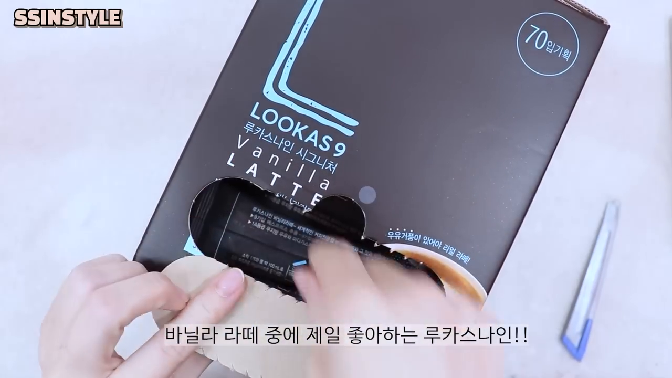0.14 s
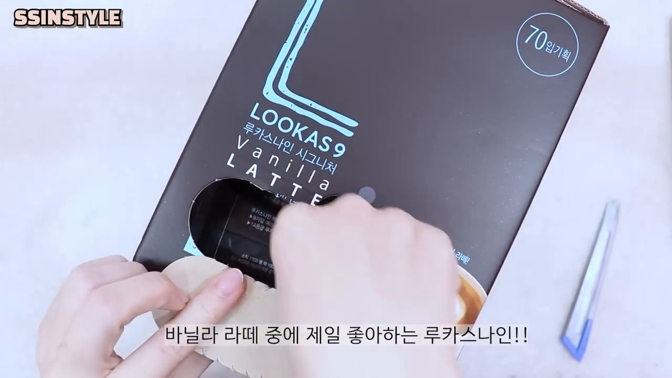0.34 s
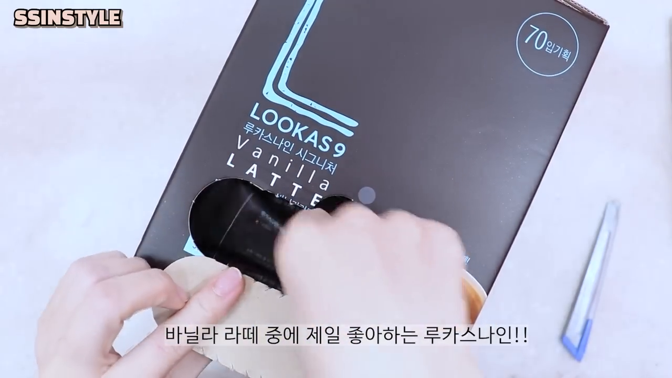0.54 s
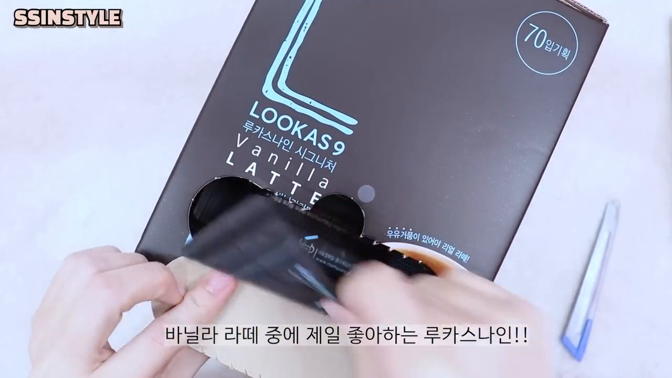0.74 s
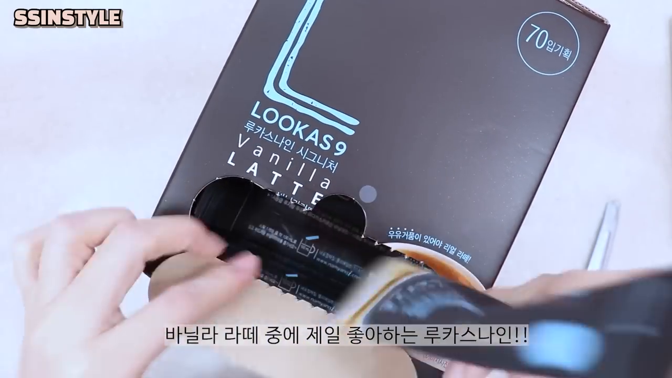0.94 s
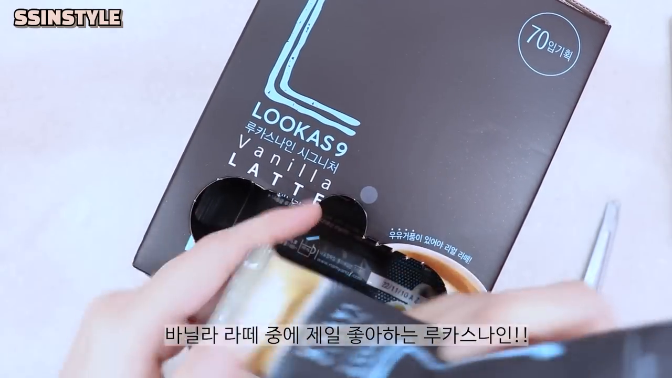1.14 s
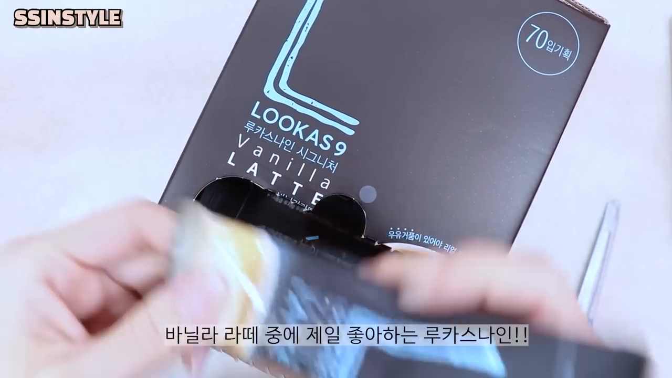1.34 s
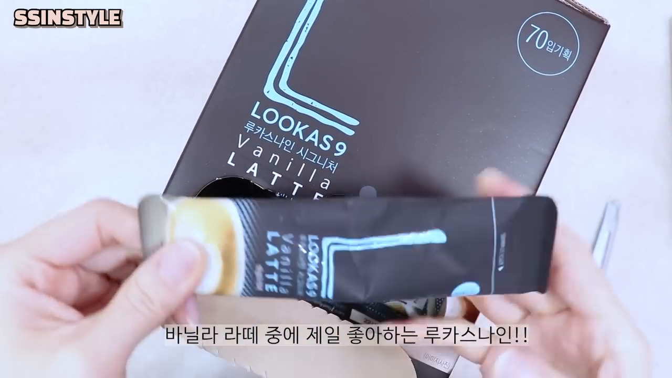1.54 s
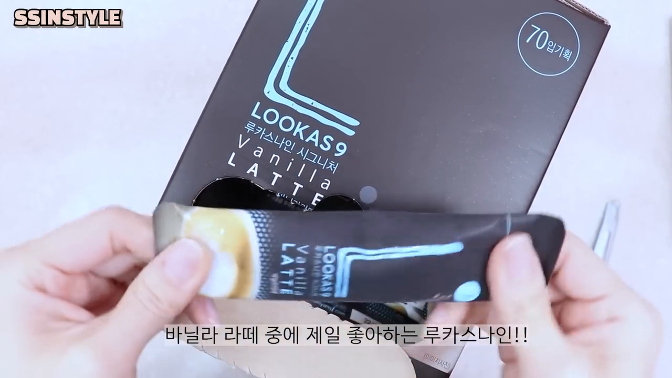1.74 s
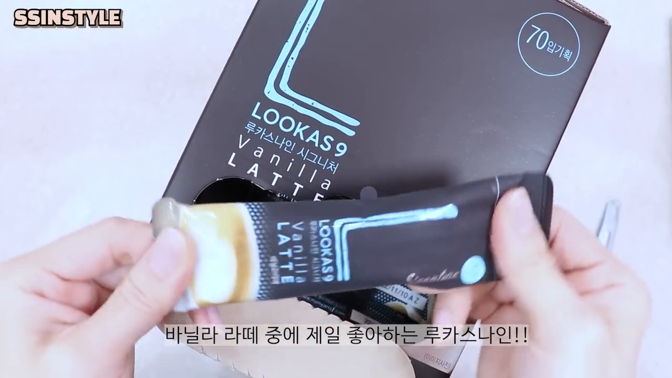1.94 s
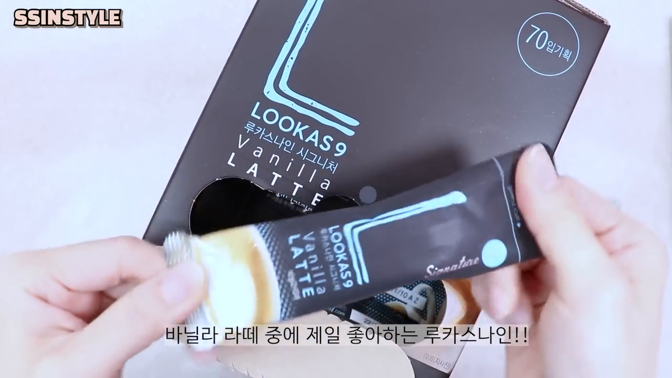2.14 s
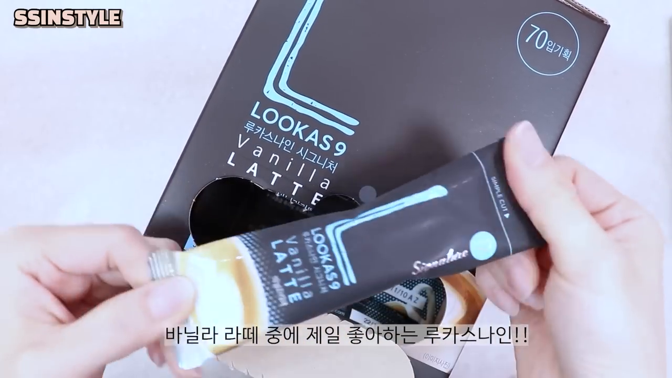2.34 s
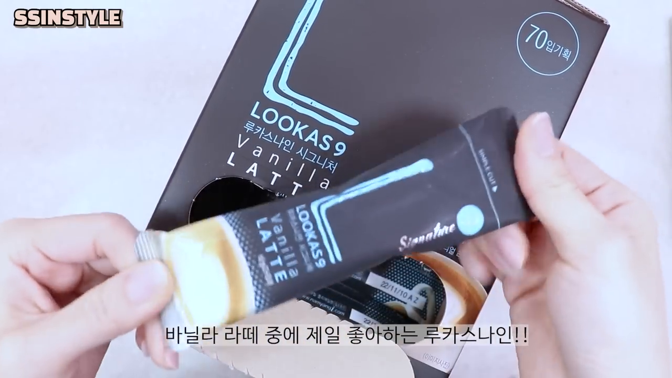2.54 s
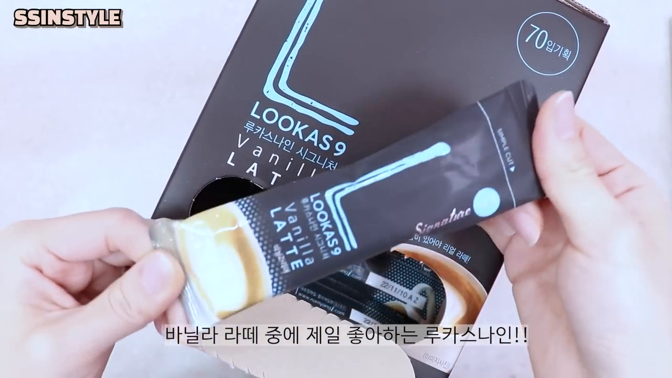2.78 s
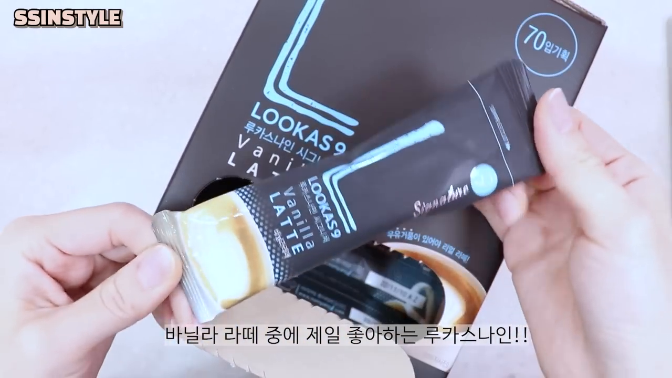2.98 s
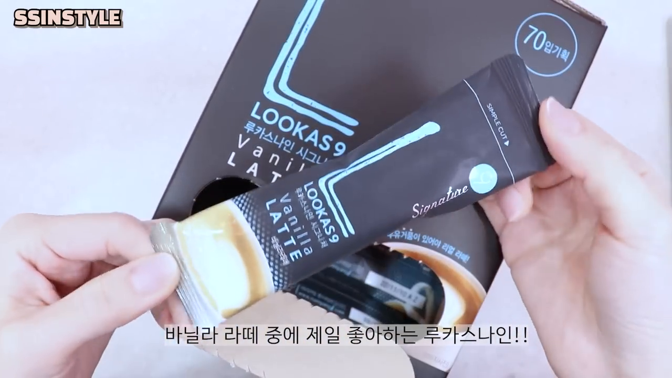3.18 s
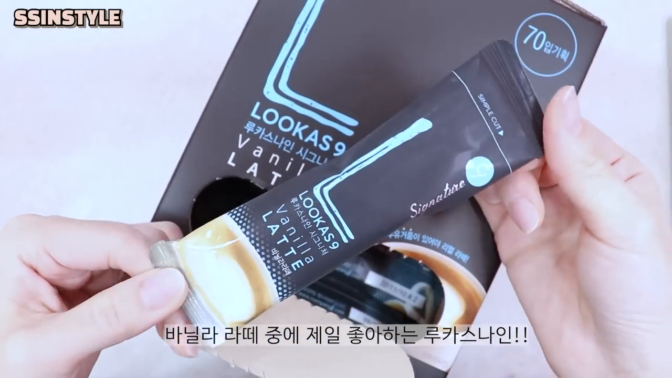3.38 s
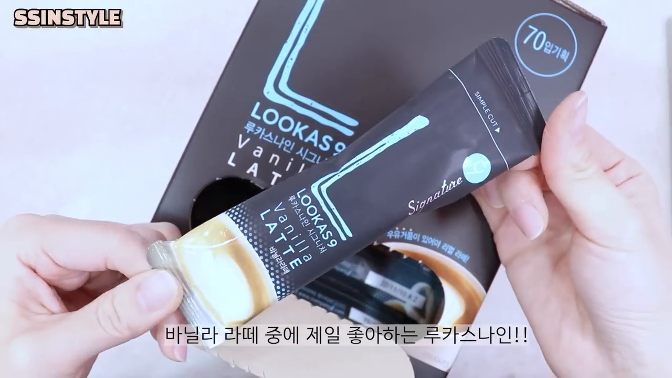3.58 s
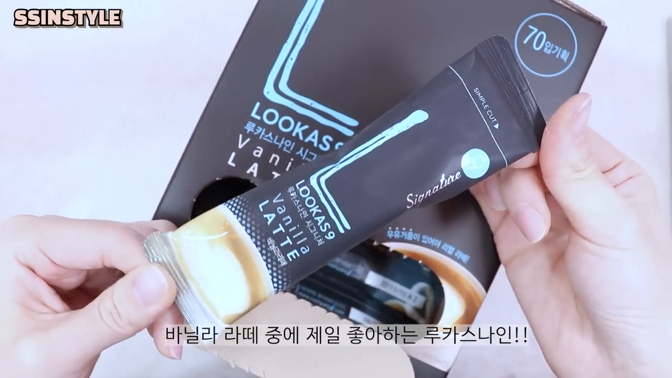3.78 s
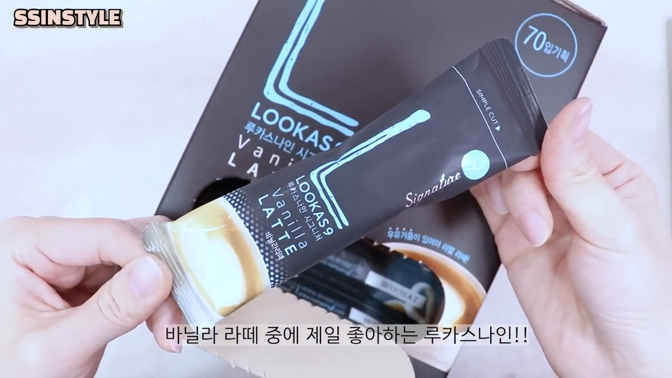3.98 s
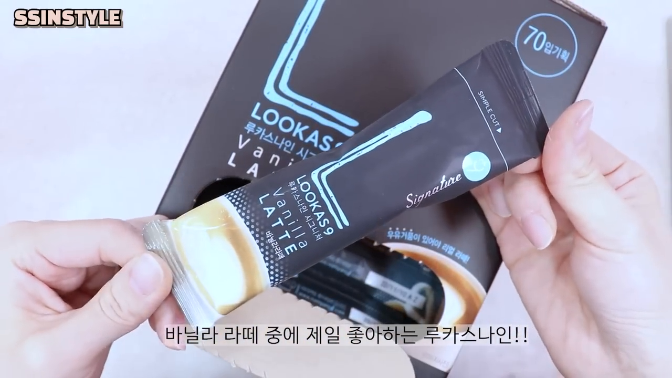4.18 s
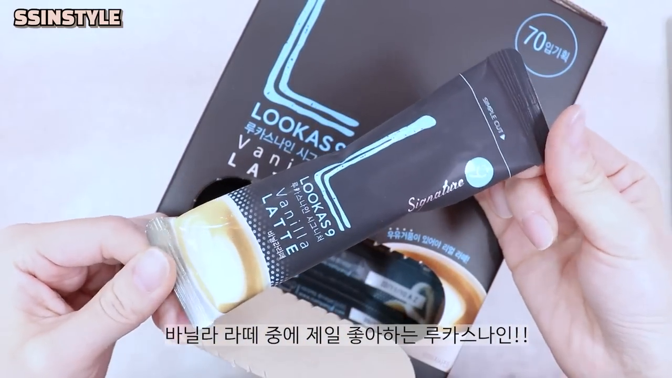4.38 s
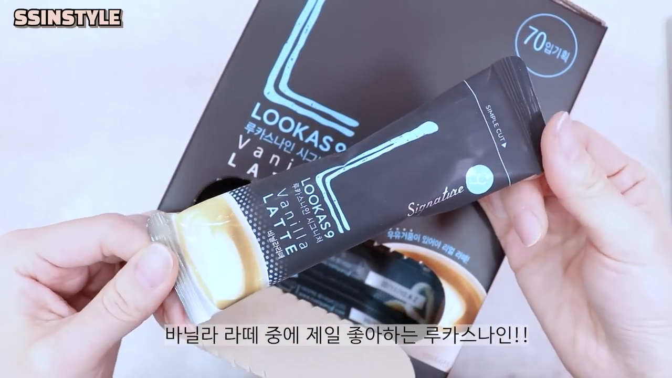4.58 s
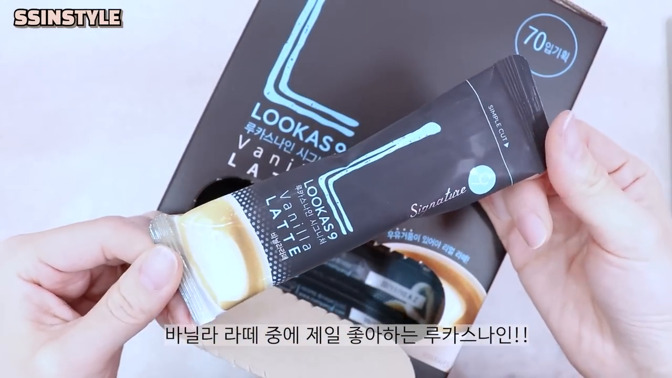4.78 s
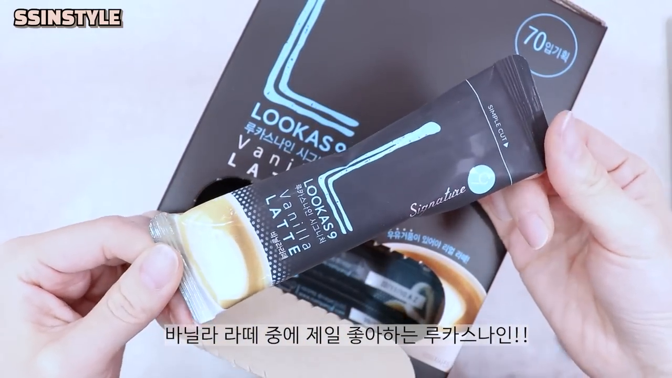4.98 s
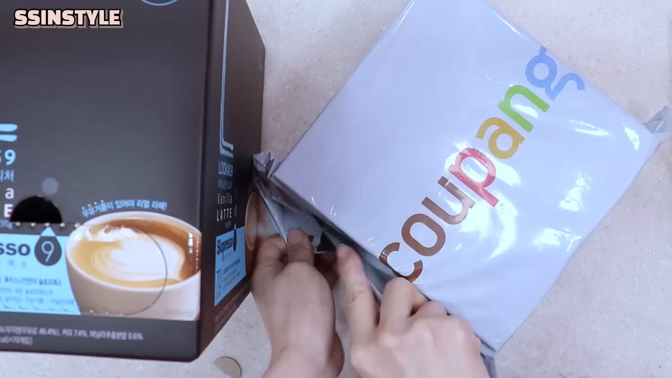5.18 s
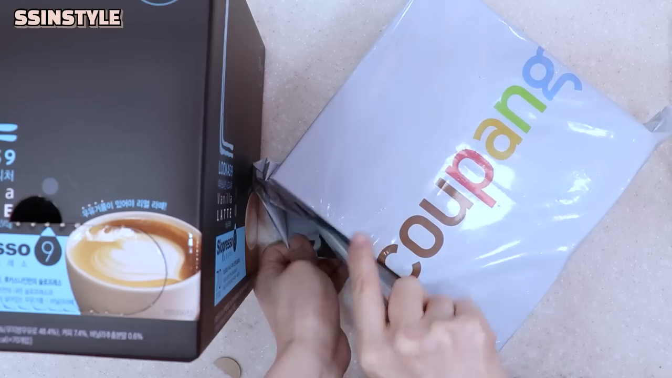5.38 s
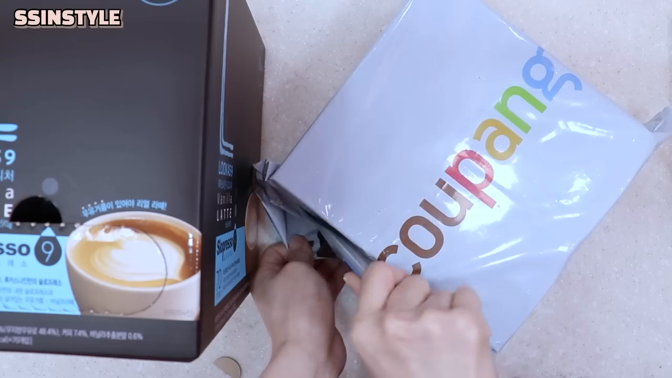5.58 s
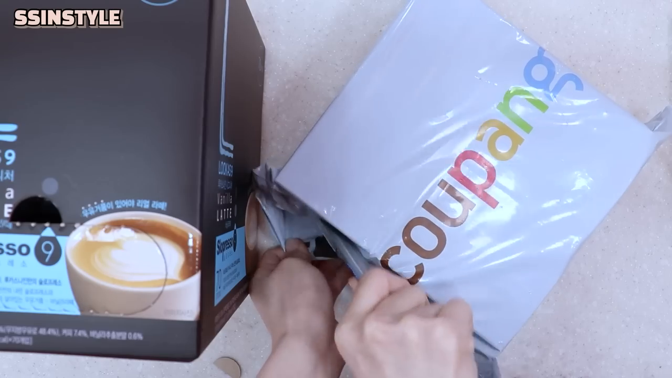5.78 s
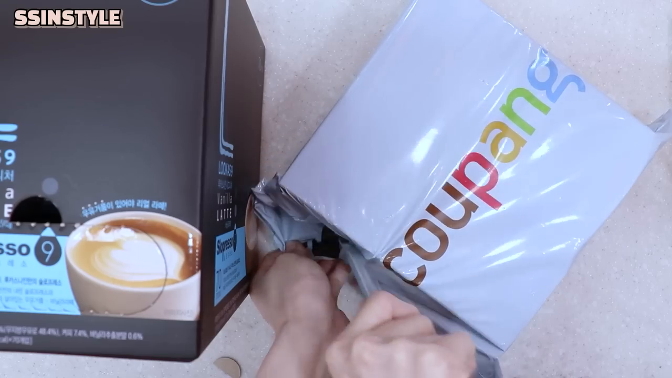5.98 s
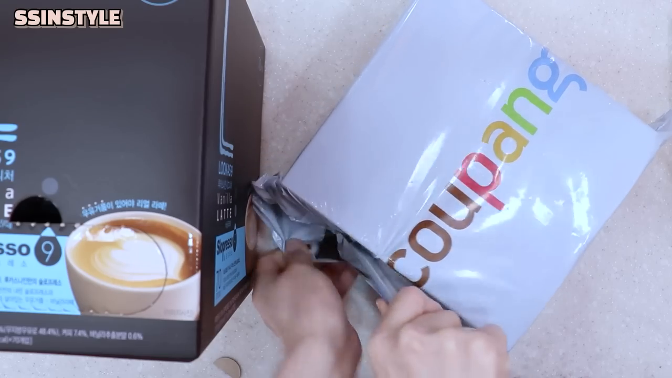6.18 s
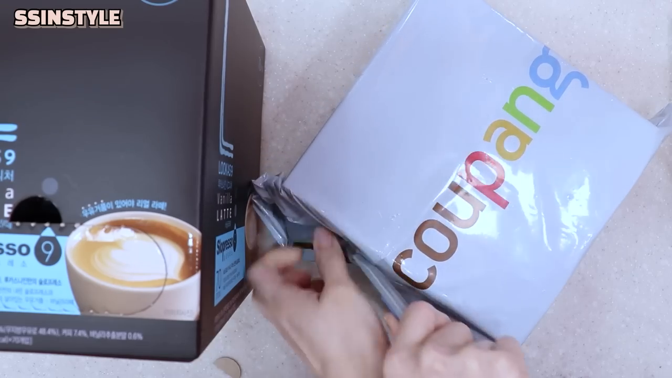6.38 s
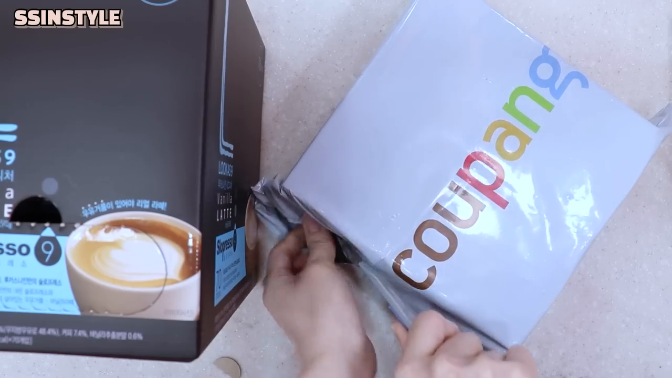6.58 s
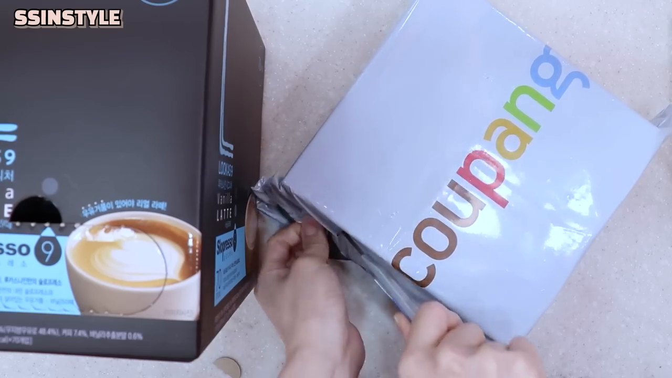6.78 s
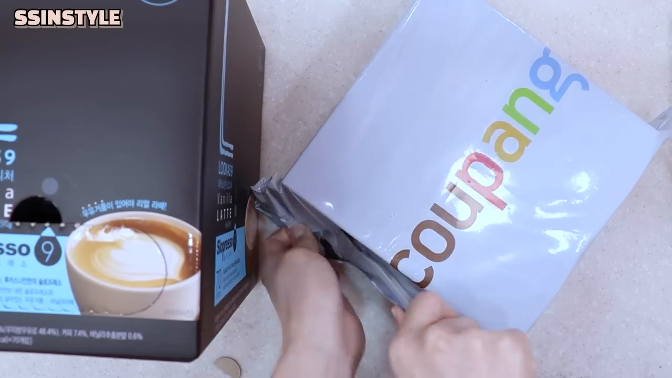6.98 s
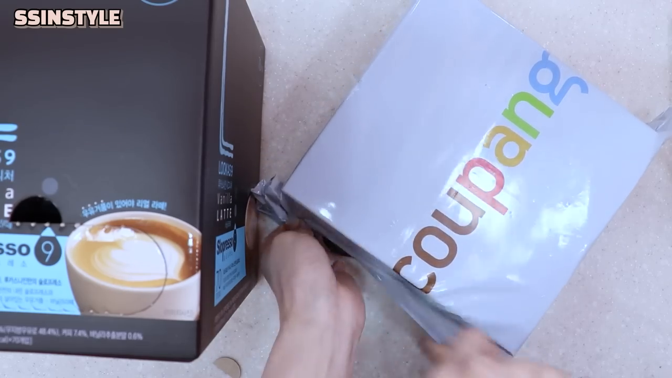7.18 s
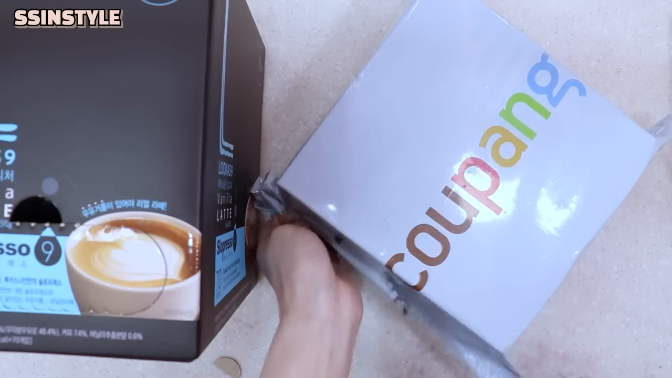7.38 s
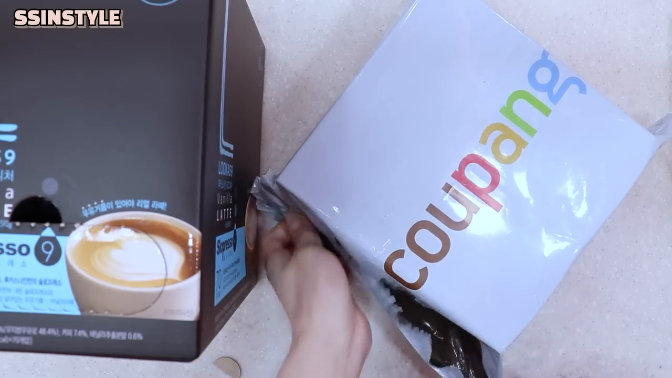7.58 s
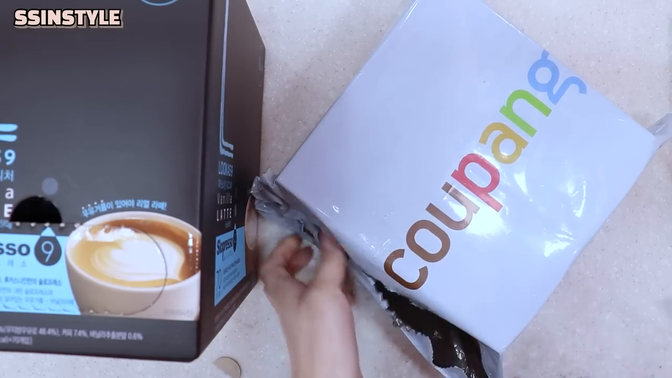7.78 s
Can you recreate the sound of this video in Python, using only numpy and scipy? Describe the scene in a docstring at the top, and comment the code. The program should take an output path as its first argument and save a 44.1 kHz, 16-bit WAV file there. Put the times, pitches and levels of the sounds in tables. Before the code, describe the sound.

Close foil rustling with sharp creases and hollow card knocks settles to near quiet, then thin plastic crumples in jerky tugs, peaking in loud snaps.

```python
"""Film hisses and crackles, creases snap, a box knocks: hands pull a foil sachet of drink powder out of a
cardboard box and turn it over, then tug open a plastic mailer bag whose slack wall flaps.
Snaps are noise bursts through ringing facets; sliding film is friction hiss mixed with a swarm of tiny wrinkles;
box and bag are struck modes. A close stereo microphone hears it in a small room with a low hum; peaks clip."""
import sys
import numpy as np
from scipy import signal
from scipy.fft import rfft, irfft, next_fast_len
from scipy.io import wavfile
from scipy.ndimage import map_coordinates

SR = 44100
rng = np.random.default_rng(int(sys.argv[2]) if len(sys.argv) > 2 else 0)


def log_audio(samples):
    """Write samples as a 16-bit WAV file to the path given in sys.argv[1]."""
    # one column per channel
    frames = np.atleast_2d(samples).T
    # limit to full scale, then quantise
    limited = np.clip(frames, -1, 1)
    pcm = np.round(limited * 32767).astype(np.int16)
    wavfile.write(sys.argv[1], SR, pcm)


N = 345741

# bass, middle and treble of the film: (low edge [Hz], high edge [Hz])
BAND_EDGES = [(130, 1450), (1450, 5300), (5300, 17000)]
BANDS = [signal.butter(3, edges, "band", fs=SR, output="sos") for edges in BAND_EDGES]

# the loudest creases snapping through:
# (time [s], middle level [dB], facet pitch [Hz], bass re middle [dB], treble re middle [dB], force t60 [s])
CREASE_SNAPS = [(0.403, -33.5, 3000, -13, -6, 0.0044), (0.4434, -32.5, 2650, -6, -12, 0.0043),
                (0.5091, -27, 1980, -5, -22, .011), (0.57, -27, 1850, -7, -9, 0.0066),
                (0.581, -25, 2000, -12, -9, 0.017), (0.6454, -22.5, 2610, -4, -4.5, 0.023),
                (0.6542, -27, 1200, -2, 0, 0.013), (0.6943, -20, 2760, -8, -4.5, 0.011),
                (0.724, -17.5, 2160, -10, -1.5, 0.0099), (0.7446, -15.5, 5450, -15, 4, 0.0065),
                (0.7667, -10.5, 2500, -20, -7, 0.011), (0.7982, -10, 2490, -15, -7.5, 0.025),
                (0.9016, -19.5, 3060, -10, -14, 0.0023), (0.931, -15.5, 2790, -22, -9, 0.029),
                (1.3035, -30, 1530, -3, -7, 0.013), (1.7704, -20, 4370, -10.5, -10, 0.0034),
                (1.7797, -25, 4280, -15, 5, 0.0054), (1.79, -24.5, 1880, -8, -23, 0.0044),
                (1.8155, -14, 2100, -16, -13, 0.013), (1.8238, -11.5, 3080, -10, -3, 0.0077),
                (1.907, -24.5, 4200, -20, -8, 0.016), (1.932, -22.5, 4900, -13, -0.5, 0.011),
                (1.9621, -25, 3230, -17, -3, 0.0059), (1.9789, -21.5, 3010, -11.5, -3, 0.018),
                (2.1849, -19, 2430, -21, -14, 0.024), (2.1906, -24.5, 4420, -14, 4.5, 0.014),
                (2.2297, -18.5, 1680, -16, -13, 0.0089), (2.2585, -18, 2430, -4.5, -5, 0.01),
                (2.2959, -23.5, 2500, -12, -16, 0.033), (2.388, -19.5, 2470, -12, -5.5, 0.0064),
                (2.408, -22, 2520, -7.5, -8, 0.017), (2.532, -19, 3600, -6.5, -5.5, 0.0084),
                (2.6047, -29, 4740, -29, 0.5, 0.0026), (2.6402, -26.5, 2090, -8.5, -13, 0.01),
                (2.914, -39.5, 2620, -9, -6, 0.0028), (3.17, -25.5, 2730, -10, -3.5, 0.0022),
                (3.197, -27.5, 3520, -13, -5, 0.029), (3.6183, -29.5, 3700, -9, -17, 0.0097),
                (4.0266, -34.5, 3400, -41, -10.5, 0.0038), (4.4954, -32, 3600, -15, -21, 0.0051),
                (4.54, -38.5, 2780, -10, -9.5, 0.11), (4.586, -42, 2370, -23, -10, .03),
                (5.27, -28, 2400, -12, 4, 0.0025), (5.281, -21.5, 2740, -10, 2.5, 0.0022),
                (5.2932, -27, 2220, -15, -1, .014), (5.313, -30.5, 1200, -2, -14, 0.0055),
                (5.399, -26.5, 6100, -14, -4, 0.023), (5.458, -17, 2720, -24, 2.5, 0.042),
                (5.546, -18, 4780, -39, 2, 0.045), (5.599, -24.5, 5100, -13, -1.5, 0.027),
                (5.619, -24, 5240, -43, -7, 0.016), (5.648, -31, 3000, -12, -10, 0.012),
                (5.676, -16.5, 3100, -47, 4.5, 0.023), (5.744, -31.5, 2220, 0, 4, 0.0054),
                (5.831, -24, 1690, -15, -50, 0.011), (5.9341, -33.5, 3700, -14, 7, 0.0071),
                (5.947, -31.5, 5930, -2, -2, 0.0074), (5.974, -31, 6490, -10, -2, .005),
                (5.993, -25, 6400, -5, 1, 0.014), (6.011, -23.5, 2920, -8.5, -14, 0.0057),
                (6.025, -20, 2550, -12.5, -1.5, 0.0053), (6.0473, -18.5, 3350, -17, -4, 0.0035),
                (6.0745, -31, 4500, -13, 2.5, 0.0031), (6.1052, -24, 2470, -8, -5.5, 0.015),
                (6.3183, -24.5, 2900, -8, -11, 0.013), (6.4052, -37, 2450, -3, 2, 0.034),
                (6.591, -31, 4430, -8.5, -2.5, 0.0061), (6.634, -29.5, 1730, -7, -4, 0.0099),
                (6.693, -23.5, 4700, -23, -8, 0.0083), (6.7426, -28, 4050, -17, -3, .007),
                (6.9833, -29, 3060, -29, 1, 0.0038), (6.9605, -31, 5460, -25, -2, 0.011),
                (7.014, -24.5, 5500, -34, -5, 0.046), (7.0894, -21, 2980, -15, -8, 0.0032),
                (7.1128, -40.5, 2400, 18, 7, 0.0031), (7.1354, -16, 3050, -10.5, -13, 0.084),
                (7.1576, -26, 2540, -21, -6, 0.0046), (7.183, -12, 2930, -5.5, 1, 0.013),
                (7.24, -5, 3160, -17, -3, 0.015), (7.2777, -14, 5240, -7, 2.5, 0.0098),
                (7.2831, -14, 8200, -9, -1.5, 0.0095), (7.293, -23, 8400, -7, 5, 0.0092),
                (7.318, -26, 4000, -8, -8, .004), (7.3324, -27.5, 2870, -8, 3, 0.012),
                (7.3738, -19.5, 1850, -7.5, -9, 0.0082), (7.385, -16, 3460, -2.5, -5, 0.0073),
                (7.3946, -22, 7460, -5.5, -4.5, 0.011), (7.4003, -24, 7660, -7, 7, 0.0062),
                (7.5802, -26, 6300, -6, 0, 0.0063), (7.601, -17, 3280, -49, -2, 0.035),
                (7.636, -25.5, 7440, -28, 4.5, .034), (7.712, -19, 3360, -48, -23, 0.019),
                (7.7298, -22.5, 3900, -43, 6, 0.018), (7.778, -32, 3100, -18, -2, .004),
                (7.8137, -20.5, 4600, -29, 9.5, 0.02)]


def snaps(facet_cycles=12, facet_db=-5, attack_s=0.00037, lead_in_db=-17, lead_in_share=0.063,
          tail_db=-26, tail_t60=0.04, sheet_db=-15, sheet_hold=1.34, cut_hz=520, dull_hz=6000,
          octave_db=17, dull_octave_db=7, pan_db=2.0, side_db=-3, left_lead_s=0.00003, lead_spread_s=0.00003):
    """A crease buckles in a quick noise burst with a faint, short lead-in; the facet rings and the sheet shivers on."""
    out, size, lead_s = np.zeros((2, N)), 2048, .005
    t = np.arange(size) / SR - lead_s
    after = np.maximum(t, 0)
    noise = stereo_noise(np.add(FILM_WIDTH, [0, side_db]), size=size * len(CREASE_SNAPS))
    chance = rng.standard_normal((len(CREASE_SNAPS), 5))
    for k, (crease, (pan, *spread)) in enumerate(zip(CREASE_SNAPS, chance)):
        s, db, hz, low_db, treble_db, t60 = crease
        fade = undb(-60 * after / t60) + undb(tail_db - 60 * after / tail_t60)
        buckle = fade * (1 - np.exp(-after / attack_s))
        lead_in = undb(lead_in_db) * np.exp(-abs(t) / (lead_in_share * t60))
        crack = noise[:, k * size:(k + 1) * size] * (buckle + lead_in)

        # neighbouring stretches of film ring on at scattered pitches
        sheet = sum(ring(crack, hz * 2 ** (0.33 + 0.93 * z), sheet_hold * t60) for z in spread)
        # the softer the fold, the more of its sound is the ring of the facet
        facet_gain = undb(facet_db - 0.2 * min(treble_db, 0))
        facet = facet_gain * ring(crack, hz, facet_cycles / hz)
        crack = crack + facet + undb(sheet_db) * sheet

        # a small facet radiates little bass, a soft fold little treble
        low_hz = cut_hz * 2 ** (-low_db / octave_db)
        high_hz = dull_hz * 2 ** (treble_db / dull_octave_db)
        crack = radiate(crack, low_hz, high_hz)
        band_levels = (db + low_db, db, db + treble_db)
        snap = sum(burst(signal.sosfilt(band, crack), level) for band, level in zip(BANDS, band_levels))

        # a snap further left is both earlier and louder there
        placed = apart(snap, left_lead_s + lead_spread_s * pan)
        add(out, s - lead_s, placed * undb(pan_db * pan * np.array([[.5], [-.5]])))
    return out


# strokes of the sachet over card and fingers; the long quiet ones are the film shifting in the grip:
# (start time [s], length [s], middle level before trim [dB], bass re middle [dB], treble re middle [dB])
SACHET_STROKES = [(-0.02, 0.13, -35.5, -6, -11.5), (0.0, 1.24, -45, -1, -4.5),
                  (0.055, 0.066, -35.5, -5, -12.5), (0.17, 0.11, -38.5, -1, -5),
                  (0.36, 0.063, -42, 2.5, -22), (0.495, 0.11, -31.5, -10, -10), (0.62, 0.17, -29, -5, -7.5),
                  (0.8, 0.083, -37.5, -28, 5.5), (0.9, 0.11, -30.5, -5, -3.5), (1.0, 0.1, -33, -20, -1),
                  (1.14, 0.79, -57, -2, 0.5), (1.15, 0.077, -41, 0, 0), (1.24, 0.31, -40.5, -15, -2),
                  (1.68, 0.068, -42.5, -12, 3), (1.755, 0.082, -30.5, -12, -7), (1.87, 0.077, -31, -18, -4),
                  (1.98, 0.087, -41, -11, -6), (2.1, 0.18, -38, -8, -0.5), (2.3, 0.17, -38.5, -15, -4.5),
                  (2.54, 0.11, -38, -18, -4.5), (2.725, 0.074, -43.5, -3.5, -8),
                  (3.005, 0.14, -45, -7, -1.5), (3.295, 0.12, -42, -25, -4.5), (3.335, 0.13, -44, -27, -16)]
# smooth sliding against crumpling: (time [s], friction hiss re crackle level [dB])
SACHET_HISS = [(.3, 6.5), (.55, -6.5), (1.0, 2), (1.7, 4.5), (1.85, -1), (2.45, 1.5), (3.0, 16)]
# tone colour of the foil: (frequency [Hz], level [dB])
SACHET_TONE = [(200, -7.5), (400, -3.5), (560, -8.5), (820, -1.5), (1300, -6), (1800, -1), (2500, -1),
               (3600, -4.5), (5500, -7.5), (8500, -10), (12000, -14.5), (15500, -16)]
# pitch of the stretch of foil being flexed: (time [s], pitch [Hz])
SACHET_PITCH = [(0.0, 4700), (0.3, 4130), (0.4, 2010), (1.53, 3400), (1.8, 2120), (3.1, 2240), (3.33, 2700),
                (3.47, 2450)]


def sachet():
    """Stiff foil slides out of the box and through the fingers, hissing and crackling with each stroke."""
    sheet = film_noise(SACHET_HISS, SACHET_TONE, wrinkles_per_s=340, spread_db=6.5, wrinkle_s=0.00039,
                       crisp_db=-0.5, patchy_db=2.5)
    strokes = effort(SACHET_STROKES, attack_s=.018, release_s=.012, swell_db=3.5)
    flexed = flex(sheet, SACHET_PITCH, lift_db=6, octaves=.27)
    return rustle(flexed, strokes, flutter_db=2, gain_db=2.06)


# tugs at the mailer:
# (start time [s], length [s], middle level before trim [dB], bass re middle [dB], treble re middle [dB])
MAILER_TUGS = [(5.1, 0.086, -45, -9, -10.5), (5.24, 0.06, -34, -4, -5.5), (5.25, 2, -50, 0, -1.5),
               (5.32, 0.12, -38.5, -4.5, -5.5), (5.45, 0.27, -44, -11, -2), (5.58, 0.075, -40.5, 0, 3),
               (5.67, 0.1, -42.5, 0.5, 2.5), (5.85, 0.19, -35.5, -7, -12), (5.905, 0.1, -38, -0.5, 4),
               (6.08, 0.12, -41.5, -1, -8), (6.255, 0.078, -38, -4.5, -5), (6.39, 0.018, -35, -7, -3),
               (6.6, 0.07, -37.5, -4.5, -4), (6.705, 0.057, -28.5, -7, -9.5), (6.855, 0.024, -34, 2.5, -11),
               (6.92, 0.19, -45, -2, -12), (7.08, 0.097, -31, -1, -1), (7.19, 0.396, -36, -3.5, -2),
               (7.463, 0.037, -25, -3, -6), (7.56, 0.1, -35.5, -8, -9), (7.68, 0.098, -41.5, -13, 2)]
# smooth sliding against crumpling: (time [s], friction hiss re crackle level [dB])
MAILER_HISS = [(5.18, 9), (5.25, -4), (6.0, -4), (6.5, -1.5), (7.1, -6), (7.48, 0.5), (7.7, 3)]
# tone colour of the plastic: (frequency [Hz], level [dB])
MAILER_TONE = [(150, -2.5), (310, 10), (430, 7.5), (650, -1), (1100, -2), (1900, -1), (3200, -2.5),
               (4500, -5.5), (6500, -1.5), (9000, -3.5), (13000, -10), (15500, -11.5)]
# pitch of the stretch of plastic being flexed: (time [s], pitch [Hz])
MAILER_PITCH = [(5.1, 2400), (5.6, 4120), (5.85, 2500), (6.64, 2140), (6.72, 3070), (7.35, 2760),
                (7.65, 3600)]


def mailer():
    """Thin plastic crumples with every tug, its flexed stretch lifting a broad moving band."""
    sheet = film_noise(MAILER_HISS, MAILER_TONE, wrinkles_per_s=280, spread_db=6, wrinkle_s=.0004,
                       crisp_db=2, patchy_db=2.5)
    tugs = effort(MAILER_TUGS, attack_s=0.0074, release_s=0.02, swell_db=-1.0)
    flexed = flex(sheet, MAILER_PITCH, lift_db=6.5, octaves=0.62)
    return rustle(flexed, tugs, flutter_db=1.64, gain_db=0.86)


# width of the film sound: (frequency [Hz], side re mid level [dB])
FILM_WIDTH = [(250, -20.5), (1000, -10), (2200, -7), (4500, -0.5), (12000, -1.1)]


def film_noise(sliding, film, wrinkles_per_s, spread_db, wrinkle_s, crisp_db, patchy_db):
    """Sliding film: smooth friction hiss under a swarm of tiny wrinkles of very unequal size."""
    noise = stereo_noise(FILM_WIDTH, size=N)
    sizes = undb(spread_db * np.minimum(rng.exponential(size=N), 2.5))
    wrinkles = (rng.random(N) < wrinkles_per_s / SR) * sizes ** 2
    power = signal.lfilter([1], [1, -np.exp(-2 / (wrinkle_s * SR))], wrinkles)
    # every wrinkle has a pitch of its own and little bass, while the hiss changes colour slowly
    crackle = radiate(noise * np.sqrt(power), low_hz=483, high_hz=18000)
    crackle = patchy(crackle, depth_db=7, per_s=79, per_octave=2.66)
    crackle = colour(unit(crackle), [(4000, 0.0055), (14000, crisp_db)])
    slide = undb(np.interp(np.arange(N) / SR, *np.transpose(sliding)))
    hiss = noise[:, ::-1]  # played backwards, so it does not follow the crackle
    contact = (crackle + slide * hiss) / np.hypot(1, slide)
    return colour(patchy(contact, patchy_db, per_s=12, per_octave=7.06), film)


def effort(strokes, attack_s, release_s, swell_db):
    """Each stroke takes hold, swells mid-way (dips if swell_db < 0), then dies away; gains for three bands."""
    t, power = np.arange(N) / SR, np.zeros((3, N))
    for start, length, db, low_db, treble_db in strokes:
        since = t - start
        grip = np.clip(since / attack_s, 0, 1) * np.exp(-np.clip((since - length) / release_s, 0, 20))
        off_middle = 2 * np.clip(since / length, 0, 1) - 1
        middle = grip * undb(db - swell_db * off_middle ** 2)
        power += np.outer(undb([low_db, 0, treble_db]), middle) ** 2
    return np.sqrt(power)


def flex(x, pitch, lift_db, octaves):
    """The flexed stretch of film lifts the rustle around its own moving pitch."""
    f, t, spectrum = signal.stft(x, SR, nperseg=256)
    away = np.log2((f[:, None] + 1) / np.interp(t, *np.transpose(pitch))) / octaves
    return signal.istft(spectrum * undb(lift_db * np.exp(-away ** 2)), SR)[1][:, :x.shape[1]]


def rustle(sheet, gains, flutter_db, gain_db):
    """The hands' effort drives bass, middle and treble of the film, each with a quick flutter."""
    out = 0
    for band, gain in zip(BANDS, gains):
        flutter = undb(gain_db + flutter_db * walk(45, size=N))
        out = out + unit(signal.sosfilt(band, sheet)) * gain * flutter
    return out


def patchy(x, depth_db, per_s, per_octave):
    """A flexing sheet keeps changing shape, so its resonances swell, shift and vanish."""
    f, t, spectrum = signal.stft(x, SR, nperseg=256)
    octave = np.log2(1 + f / 500)
    field = rng.standard_normal((96, 256))
    where = np.meshgrid(octave * per_octave, t * per_s, indexing="ij")
    db = depth_db * map_coordinates(field, where, order=1, mode="wrap")
    return signal.istft(spectrum * undb(db), SR)[1][:, :x.shape[1]]


# knocks on the box: (time [s], air boom level before trim [dB], panel clack level [dB])
BOX_KNOCKS = [(0.652, -21.5, -24.5), (0.694, -18, -16.5), (0.765, -21.5, -17), (0.905, -31, -26.5),
              (0.924, -25.5, -22.5), (0.932, -17.5, -13.5), (1.168, -38, -24.5), (1.18, -33, -30)]
# modes of the air inside the box: (frequency [Hz], relative level [dB], t60 [s])
BOX_AIR_MODES = [(113, -12, 0.049), (210, -20, 0.093), (302, 3, 0.12)]
# modes of the card panels: (frequency [Hz], relative level [dB], t60 [s])
BOX_PANEL_MODES = [(737, -9.5, 0.04), (818, 17.5, 0.03), (963, 12.5, 0.034), (1050, 1, 0.12)]


def box(air_trim_db=4.0, contact_s=0.0051):
    """The sachet catches on the opening: the panels clack and the air inside booms."""
    out = np.zeros((2, N))
    for s, boom_db, clack_db in BOX_KNOCKS:
        boom = burst(blow(BOX_AIR_MODES, contact_s), boom_db + air_trim_db)
        clack = burst(blow(BOX_PANEL_MODES, contact_s), clack_db)
        add(out, s, boom + clack)
    return out


# the slack bag flapping: (time [s], level before wall and air trims [dB])
BAG_FLAPS = [(5.454, -36), (5.577, -35), (5.89, -34.5), (6.315, -36), (6.706, -29.5), (6.726, -28),
             (6.908, -35), (7.184, -26), (7.241, -22.5), (7.293, -26), (7.384, -30), (7.42, -41),
             (7.491, -35.5)]
# modes of the bag's wall: (frequency [Hz], relative level [dB], t60 [s])
BAG_WALL_MODES = [(153, -8.5, 0.037), (263, -9, 0.027), (425, -0.5, 0.048), (830, -5.5, 0.015)]


def bag(wall_trim_db=4.5, push_s=0.0045, air_trim_db=3.0, air_hz=308, squeeze=0.28, settle_s=0.016, air_t60=0.14):
    """The slack wall of the mailer flaps; the air inside hoots on, its pitch sinking as the bag bellies out."""
    out, t = np.zeros((2, N)), np.arange(SR // 3) / SR
    for s, db in BAG_FLAPS:
        rest_hz = air_hz * (1 + 0.027 * rng.standard_normal())
        hz = rest_hz * (1 + squeeze * np.exp(-t / settle_s))
        swell = (1 - np.exp(-t / push_s)) * np.exp(-np.log(1000) * t / air_t60)
        air = np.sin(2 * np.pi * np.cumsum(hz) / SR) * swell
        wall = burst(blow(BAG_WALL_MODES, push_s), db + wall_trim_db)
        add(out, s, wall + burst(air[None], db + air_trim_db))
    return out


def blow(modes, contact_s):
    """A scraping push sets a set of modes ringing, each a little differently every time."""
    t = np.arange(SR // 3) / SR
    out = 0
    for hz, db, t60 in modes:
        push = rng.standard_normal(len(t)) * np.exp(-t / contact_s) / np.sqrt(contact_s * SR / 2)
        push[0] += 1
        mode = ring(push, hz * (1 + 0.0039 * rng.standard_normal()), t60)
        # soft contact: nothing much far from the mode
        mode = signal.sosfilt(signal.butter(2, [hz / 2, 2 * hz], "band", fs=SR, output="sos"), mode)
        out = out + burst(mode[None], db)
    return out * undb(np.array([[.7], [-.7]]))  # slightly left


def room(x, wet_db=-19, t60=0.55, gap_s=0.0085):
    """Short, soft reflections from the table and the walls: a gap, then decaying noise with a darker tone."""
    t = np.arange(SR // 3) / SR
    tail = stereo_noise(FILM_WIDTH, size=len(t)) * np.exp(-np.log(1000) * t / t60) * (t > gap_s)
    tail = tail / np.sqrt(np.sum(tail ** 2) / 2)
    tail = colour(tail, [(300, 12.1), (3000, 4.4), (14000, 0.78)])
    return x + undb(wet_db) * signal.oaconvolve(x, tail, axes=1)[:, :N]


# tone of the room hum: (frequency [Hz], relative level per Hz [dB])
HUM_TONE = [(20, -3), (45, -13.5), (65, -12.5), (110, -4), (160, -5.5), (250, -2.5), (400, -7), (600, -13),
            (1100, -19), (2000, -27), (4500, -36), (9300, -41), (15500, -54)]
# width of the room hum: (frequency [Hz], side re mid level [dB])
HUM_WIDTH = [(70, -16.5), (250, -17.5), (1000, -2), (4000, 2), (12000, 0)]


def hum(level_db=-42.5):
    """Steady low rush of the room: coloured noise, a touch louder on the left."""
    rush = unit(colour(stereo_noise(HUM_WIDTH, size=N), HUM_TONE))
    return rush * undb(level_db + np.array([[.6], [-.6]]))


def undb(db):
    """Decibels to gain."""
    return 10 ** (np.asarray(db) / 20)


def unit(x):
    """Scale to rms 1."""
    return x / np.sqrt(np.mean(x ** 2))


def burst(x, db):
    """Scale a short sound to the energy of 5 ms at this level."""
    return x * undb(db) / np.sqrt(np.sum(x ** 2) / len(x) / (.005 * SR))


def add(out, s, x):
    """Mix x in at time s."""
    i = int(s * SR)
    out[:, i:i + x.shape[1]] += x[:, :N - i]


def colour(x, points):
    """Filter by a smooth (frequency [Hz], level [dB]) curve."""
    hz, db = np.transpose(points)
    size = next_fast_len(x.shape[-1])
    f = np.maximum(np.arange(size // 2 + 1) * SR / size, 1)
    gain = undb(np.interp(np.log(f), np.log(hz), db))
    return irfft(rfft(x, size) * gain, size)[..., :x.shape[-1]]


def stereo_noise(side_points, size):
    """White mid noise plus side noise whose (frequency [Hz], level [dB]) curve sets how wide each pitch sounds."""
    mid, side = rng.standard_normal((2, size))
    side = colour(side, side_points)
    return unit(np.array([mid + side, mid - side]))


def ring(x, hz, t60):
    """One damped mode; its impulse response has about unit energy."""
    r = np.exp(-np.log(1000) / (t60 * SR))
    pole = r * np.exp(2j * np.pi * min(hz, SR / 2) / SR)
    return signal.lfilter([np.sqrt(2 * (1 - r * r))], [1, -pole], x).real


def radiate(x, low_hz, high_hz):
    """Two gentle high-pass stages and one gentle low-pass."""
    r, q = np.exp(-2 * np.pi * np.array([low_hz, high_hz]) / SR)
    return signal.sosfilt([[1, -2, 1, 1, -2 * r, r * r], [1 - q, 0, 0, 1, -q, 0]], x)


def walk(rate, size):
    """Random values, rate of them a second, joined by straight lines; spread near 1."""
    knots = rng.standard_normal(1024)
    return np.interp(np.arange(size) * rate / SR, np.arange(len(knots)), knots)


def apart(x, lead_s):
    """The sound reaches the left capsule this much before the right one."""
    turn = np.exp(1j * np.pi * np.fft.rfftfreq(x.shape[1]) * SR * lead_s)
    return irfft(rfft(x) * np.array([turn, turn.conj()]))


def scene():
    """Sachet and box first, then the mailer, all in the same room."""
    return room(snaps() + sachet() + mailer() + box() + bag()) + hum()


def record(dry, low_cut_hz=55, top_hz=15900):
    """The hardest snaps clip; the deepest bass and the top are cut."""
    clipped = np.clip(dry, -1, 1)
    clipped = signal.sosfilt(signal.butter(2, low_cut_hz, "high", fs=SR, output="sos"), clipped)
    return signal.sosfilt(signal.ellip(10, .2, 70, top_hz, fs=SR, output="sos"), clipped)


dry = scene()
out = record(dry)
log_audio(out)
```